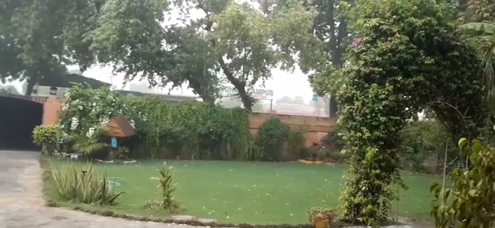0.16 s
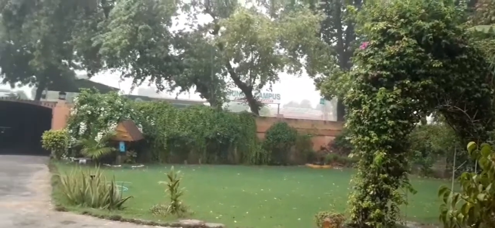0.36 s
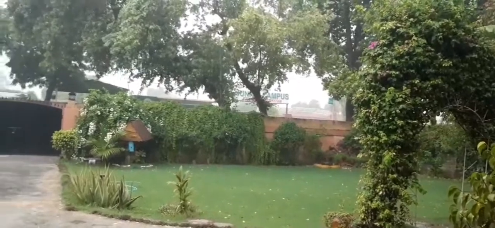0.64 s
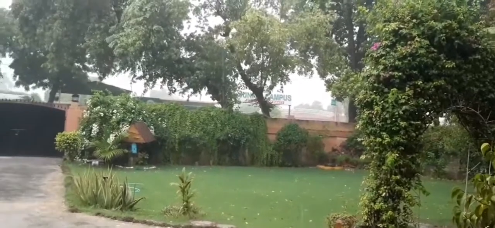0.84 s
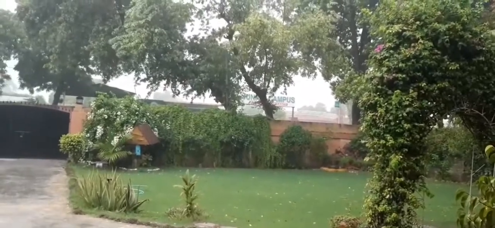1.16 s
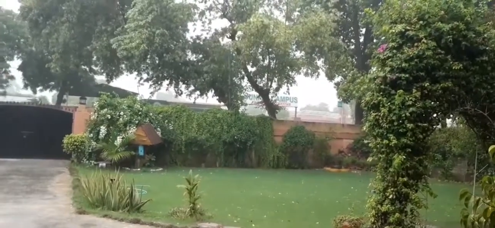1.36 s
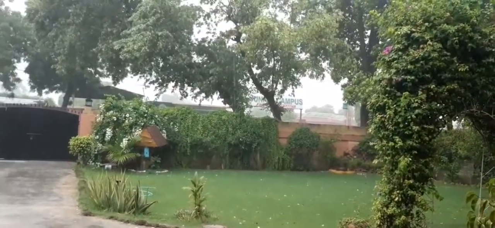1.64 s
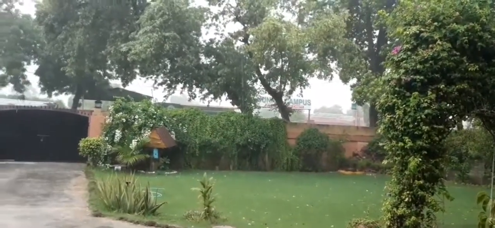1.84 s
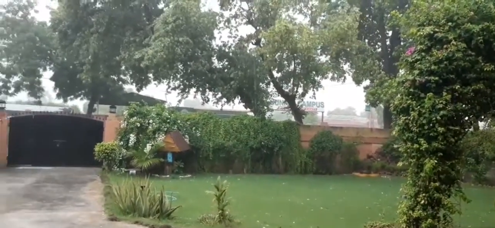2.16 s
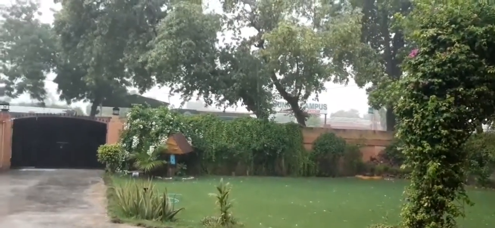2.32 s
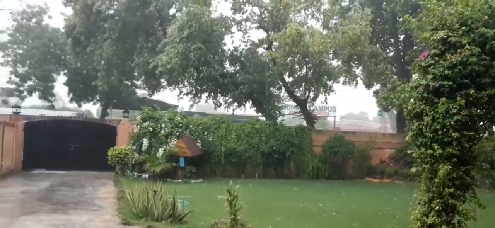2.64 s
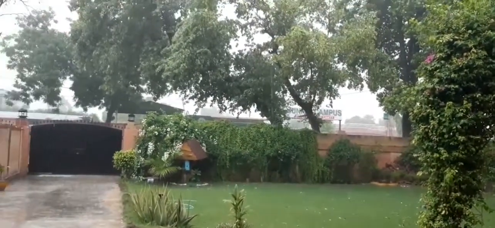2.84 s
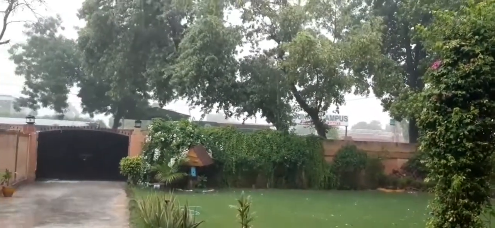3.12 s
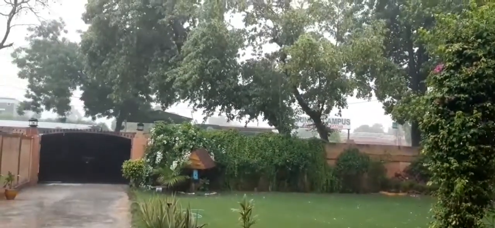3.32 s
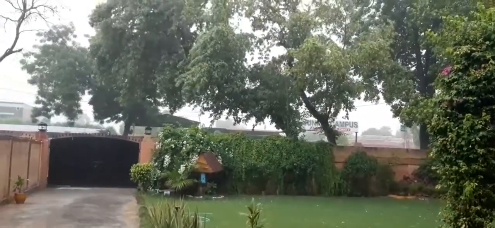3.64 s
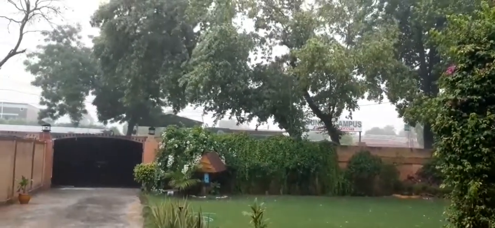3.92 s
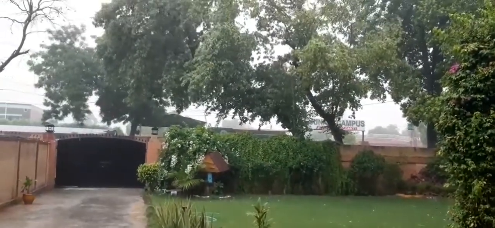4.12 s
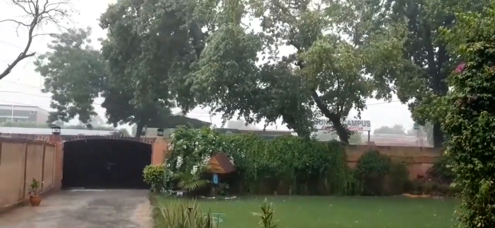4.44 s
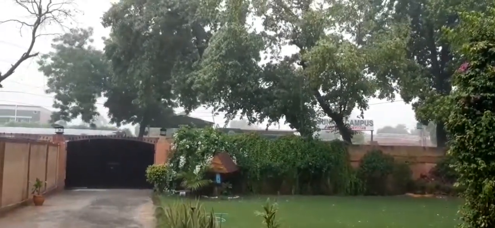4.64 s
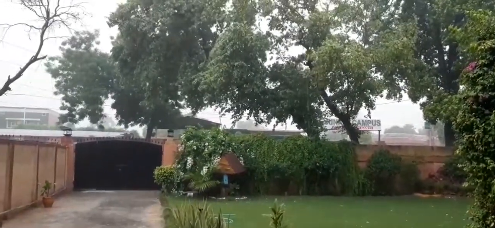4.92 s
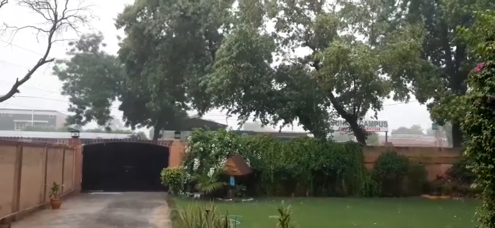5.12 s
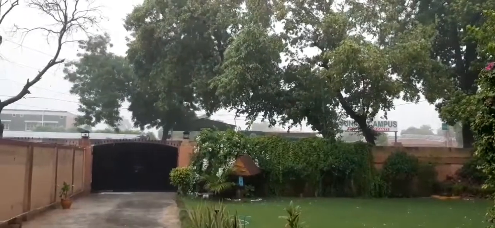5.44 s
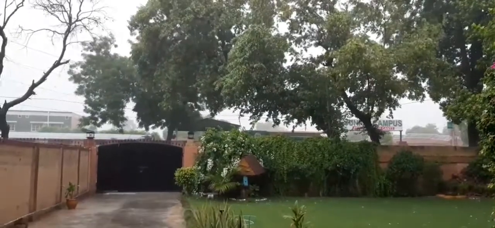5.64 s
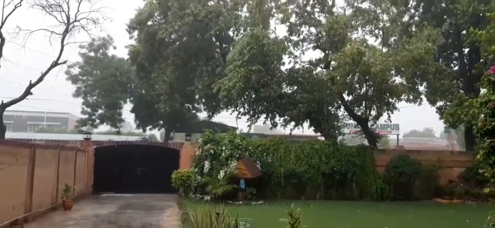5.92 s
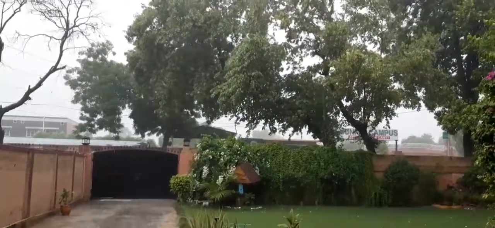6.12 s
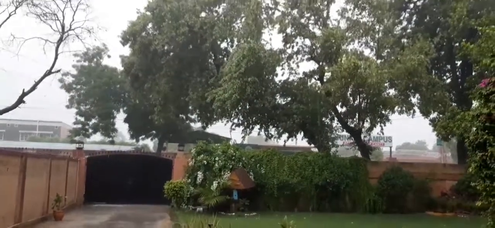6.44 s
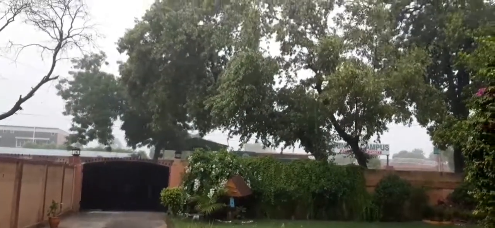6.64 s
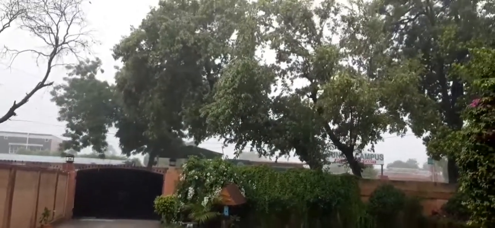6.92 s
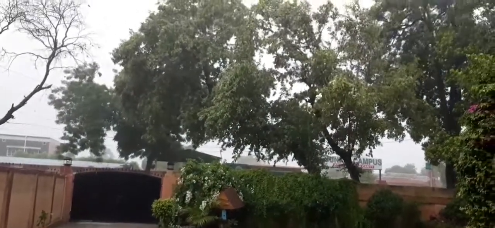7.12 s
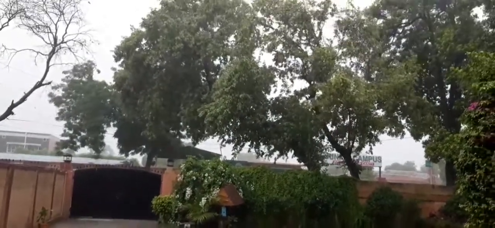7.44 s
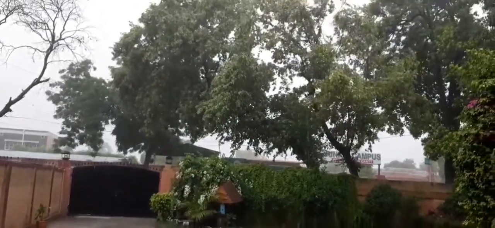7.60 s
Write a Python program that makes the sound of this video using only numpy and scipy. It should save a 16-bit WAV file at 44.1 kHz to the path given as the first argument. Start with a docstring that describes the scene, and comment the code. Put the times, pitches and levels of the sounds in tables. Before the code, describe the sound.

A heavy, steady downpour fills a garden for nearly eight seconds, heard from under a veranda. Dense hiss and fine spray on leaves and grass sit over a low distant roar that swells slightly after 3 s. Close eave drips smack wet paving with hard, bright clicks, short splashes and grainy spatter, sparse at first, a strong one at 1.8 s. High recorder hiss fades soon after 2 s. A tight cluster of drips hits around 3.0-3.2 s with burbling puddle bubbles; more bubbles come near 4.7-5 s. Strong smacks fall at 3.8, 4.2 and 5.3 s, the loudest at 5.9 s, then a rapid run at 6.65-6.8 s and more drips to the end. Very faint hoots at 3 and 4.8-5.7 s, dull knocks at 4 and 7.5 s, and soft air puffs and uneven rumble lie underneath. The right channel carries nearly everything.

```python
"""Heavy rain on a garden, heard from under a veranda roof: fat drips from the eaves smack, splash and spatter
on wet paving, as short pressure pulses followed by bursts of grainy noise. Smaller drops patter on leaves, and
countless far ones merge into coloured noise: a hiss and fine spray over a low roar. Bubbles ring in puddles;
modulated tones and low modes make faint far hoots and knocks. Low rumble, soft puffs of air and, at first,
a high hiss of the recorder lie beneath. Almost everything is in the right channel: the left is nearly silent."""
import sys
import numpy as np
from scipy import signal
from scipy.fft import rfft, irfft, next_fast_len
from scipy.io import wavfile
from scipy.ndimage import uniform_filter1d

SR = 44100
rng = np.random.default_rng(int(sys.argv[2]) if len(sys.argv) > 2 else 0)


def pcm_store(signal):
    """Save signal as 16-bit PCM."""
    levels = np.round(np.clip(np.atleast_2d(signal), -1, 1) * 32767)
    wavfile.write(sys.argv[1], SR, levels.astype(np.int16).T)


N = 342657
T = np.arange(N) / SR
SMACK_PEAK_S = 0.001  # a smack peaks this long after its start

# colour of the rain on leaves and grass: hz, density_db (dB per Hz)
HISS_COLOUR = [(200, -13.5), (600, -2.5), (1100, -3), (1800, 1), (2150, 2), (2500, 3.5), (3000, -1),
               (4500, -2), (6500, 1.7), (8000, -1), (12000, -14)]
# colour of the finest spray: hz, density_db (dB per Hz)
SPRAY_COLOUR = [(3000, -30), (6000, -17), (10000, 7), (13000, 4), (15500, 2.5)]
# response of the microphone port, a deep notch between two humps: hz, gain_db
PORT_RESPONSE = [(5200, 0.5), (5900, 2), (6450, 1), (6800, -6), (7300, -15), (7800, -59), (8500, -33),
                 (9300, -18.5), (10300, -12.5), (11500, -3.5), (12700, 3), (15500, 4)]


def undb(db):
    """Decibels to amplitude: twenty decibels are a factor of ten."""
    return 10 ** (np.asarray(db) / 20)


def unit(x):
    """Normalisation: scale to an rms of one."""
    return x / np.sqrt(np.mean(x ** 2))


def noise(size=N):
    """White noise: equal expected power at every frequency."""
    return rng.standard_normal(size)


def colour(x, points):
    """Minimum-phase filtering: the folded cepstrum of the (hz, db) points gives a causal response."""
    hz, db = np.transpose(points)
    size = 2 * next_fast_len(len(x))
    f = np.maximum(np.arange(size // 2 + 1) * SR / size, 1)
    log_gain = np.log(undb(np.interp(np.log(f), np.log(hz), db)))
    cepstrum = irfft(log_gain)
    # fold the negative times onto the positive ones
    cepstrum[1:size // 2] *= 2
    cepstrum[size // 2 + 1:] = 0
    response = np.exp(rfft(cepstrum))
    return irfft(rfft(x, size) * response)[:len(x)]


def walk(rate):
    """Slow random modulation: noise held for 1 / rate seconds, smoothed twice, with an rms of one."""
    k = int(SR / rate)
    steps = np.repeat(noise(N // k + 1), k)
    smooth = uniform_filter1d(uniform_filter1d(steps, k), k)
    return unit(smooth[:N])


def add(track, s, sound):
    """Superposition: mix a sound into a track at a time in seconds."""
    i = int(np.clip(s * SR, 0, N - 1))
    track[i:i + len(sound)] += sound[:N - i]


def level(points):
    """Amplitude envelope: gain over time from (time_s, level_db) points."""
    return undb(np.interp(T, *np.transpose(points)))


def swell(s, width_s):
    """A Gaussian envelope: a smooth rise and fall around a moment, with a top of one."""
    return np.exp(-((T - s) / width_s) ** 2)


def impacts(per_s, spread_db):
    """A random impulse process: independent arrivals, many small or far drops and a few big or near ones."""
    chance = rng.random(N)
    size = np.minimum(rng.exponential(size=N), 5)
    sign = np.sign(noise())
    return (chance < per_s / SR) * sign * undb(spread_db * size)


def wash(points, per_s, spread_db, flutter_db):
    """Dense superposition: drops merge into coloured noise whose strength flutters a little."""
    drops = unit(impacts(per_s, spread_db)) + noise()
    return unit(colour(drops, points)) * undb(flutter_db * walk(16))


def smack(hz, cycles=0.47, ring_db=-12, ring_cycles=1.5):
    """Impact pressure of a drop flattening on a wet surface, then a ring, longer on a springier surface."""
    t = np.arange(8 * SR // 1000) / SR - SMACK_PEAK_S
    pulse = np.exp(-(hz * t / cycles) ** 2 / 2)
    decay = np.exp(-abs(t) * hz / (ring_cycles * cycles))
    ring = undb(ring_db) * (t > 0) * (1 - pulse) * decay
    return -np.cos(2 * np.pi * hz * t) * (pulse + ring)


def droplets(hz, points, rise_s, fall_s, grain_db, broad_db=-1):
    """Granular noise of thrown droplets, coloured by smack and surroundings; it rises, then decays."""
    t = np.arange(SR // 3) / SR
    grains = np.clip(noise(len(t)), -2, 2)
    sizes = undb(grain_db * np.repeat(grains, 24)[:len(t)])  # each grain lasts 24 samples
    tuned = signal.fftconvolve(noise(len(t)) * sizes, smack(hz, cycles=0.25))[:len(t)]
    broad = unit(noise(len(t)) * sizes)
    ticks = unit(tuned) + undb(broad_db) * broad
    return unit(colour(ticks, points)) * (1 - np.exp(-t / rise_s)) * np.exp(-t / fall_s)


def splash(hz):
    """Breakup on impact: a fast burst of droplets with the colour of early reflections under the roof."""
    # colour of the echo under the roof: hz, gain_db
    veranda = [(500, -14), (1300, -11), (1800, 5), (2500, 12.5), (3100, 11), (4500, 9), (6500, 13),
               (12000, 7.5)]
    return droplets(hz, veranda, rise_s=0.0006, fall_s=0.012, grain_db=2.0)


def bubble(hz, cycles=7, glide=0.16):
    """Resonance of a trapped air bubble: a decaying ring that rises in pitch as it nears the surface."""
    t = np.arange(SR // 50) / SR
    age = t * hz / cycles
    pitch_hz = hz * (1 + glide * (1 - np.exp(-age)))
    return np.sin(2 * np.pi * np.cumsum(pitch_hz) / SR) * np.exp(-age)


def left_background(buffet_db=-12):
    """Superposed noises: a very faint hiss, an uneven rumble and weak puffs of air."""
    # colour of the low rumble: hz, density_db (dB per Hz)
    rumble_colour = [(25, -18), (60, -4), (105, -2), (150, -23), (220, -26), (300, -24), (420, -34),
                     (800, -26), (1100, -36.5), (3000, -37), (9000, -76)]
    far_hiss = undb(-78.5) * unit(colour(noise(), HISS_COLOUR))
    far_spray = undb(-67.0) * unit(colour(noise(), SPRAY_COLOUR))
    faint_hiss = colour(far_hiss + far_spray, PORT_RESPONSE)
    rumble = undb(-61.5 + 2.2 * walk(3.3)) * unit(colour(noise(), rumble_colour))
    return faint_hiss + rumble + undb(buffet_db) * buffet()


def recorder_hiss(start_db=-31, sag_db_per_s=2, hold_s=1.9, fade_db_per_s=28):
    """Exponential decay of noise: high hiss of the recorder sags slowly, then fades fast after hold_s."""
    db = start_db - sag_db_per_s * T - fade_db_per_s * np.maximum(T - hold_s, 0)  # the fade joins the sag
    hiss_colour = [(4500, -14), (5900, 10.5), (6700, 11.5), (7400, 0.0), (8400, -6.0), (11000, 0.5),
                   (14000, -16)]  # hz, gain_db
    return undb(db) * unit(colour(noise(), hiss_colour))


def drone(uneven_db=2.0):
    """Amplitude-modulated low noise: a far rumble, perhaps traffic, that comes up unevenly and recedes."""
    # colour of the rumble: hz, density_db (dB per Hz)
    rumble_colour = [(50, -32), (85, -7), (114, 0), (160, -3.5), (200, -12.5), (400, -40.5)]
    # level before the random unevenness: time_s, level_db
    rumble_level = [(0, -44), (2.5, -46.5), (3.05, -36), (3.35, -42), (4.05, -39), (4.4, -41), (4.9, -36.5),
                    (5.4, -41.5), (6.35, -44), (6.62, -34), (6.85, -52), (7.77, -52)]
    return level(rumble_level) * undb(uneven_db * walk(7.6)) * unit(colour(noise(), rumble_colour))


def knocks(rise_s=0.006, fall_s=0.03, blur=0.012):
    """Modal vibration: a few low modes make far hollow knocks, softened and blurred by the distance."""
    # the knocks: start_s, level_db, pitch_ratio
    strikes = [(4.025, -33, 1.04), (7.527, -28, 1.0)]
    # modes at a pitch ratio of one: pitch_hz, level_db
    modes = [(684, 0), (818, 0), (931, -7), (1170, -3)]
    out, t = np.zeros(N), T[:SR // 4]
    envelope = (1 - np.exp(-t / rise_s)) * np.exp(-t / fall_s)
    for s, db, ratio in strikes:
        ring = np.zeros(len(t))
        for hz, mode_db in modes:
            pitch_hz = ratio * hz * (1 + blur * walk(120)[:len(t)])
            ring += undb(mode_db) * np.sin(2 * np.pi * np.cumsum(pitch_hz) / SR)
        add(out, s, undb(db) * ring * envelope)
    return out


def hoots(waver=0.006):
    """Frequency modulation: faint sine tones wander randomly in pitch, blurred by the distance."""
    # the hoots: start_s, length_s, pitch_hz, level_db
    calls = [(3.05, 0.5, 460, -45.5), (4.815, 0.16, 563, -38), (5.009, 0.21, 576, -36.5),
             (5.407, 0.29, 428, -42.5)]
    out = np.zeros(N)
    for s, length_s, hz, db in calls:
        gate = signal.windows.tukey(int(length_s * SR), .5)
        pitch_hz = hz * (1 + waver * walk(28.8))
        tone = unit(np.sin(2 * np.pi * np.cumsum(pitch_hz) / SR))
        add(out, s, undb(db) * gate * tone[:len(gate)])
    return out


def buffet():
    """Turbulent pressure of air puffs on a microphone port: soft swells of very low noise."""
    # the puffs: centre_s, half_width_s, level_db
    puffs = [(1.05, 0.18, -44), (2.62, 0.084, -46), (3.0, 0.06, -33.5), (5.55, 0.11, -32), (6.3, 0.39, -47)]
    # colour of the puffs: hz, density_db (dB per Hz)
    puff_colour = [(20, -36), (38, -12), (55, -2), (80, 4), (160, -30), (600, -68)]
    strength = sum(undb(db) * swell(s, width_s) for s, width_s, db in puffs)
    return strength * unit(colour(noise(), puff_colour))


def roar():
    """Incoherent addition: the far downpour is low coloured noise that swells once and sinks back."""
    # colour of the far downpour: hz, density_db (dB per Hz)
    roar_colour = [(25, -44), (40, -17), (58, -5), (95, -2.5), (114, 0), (145, -2.5), (200, -2.5),
                   (285, -2.5), (410, -9.5), (540, -6), (660, -9.5), (820, -5), (1050, -13.5), (2000, -32)]
    # level of the far downpour: time_s, level_db
    roar_level = [(0, -32.5), (1.2, -33), (2.0, -33.5), (2.9, -31.5), (4.9, -30.5), (5.9, -32), (7.77, -32)]
    return level(roar_level) * unit(colour(noise(), roar_colour))


def hiss(start_db=-26, ease_db_per_s=0.0859):
    """Incoherent addition of drops on leaves and grass: a dense hiss that eases very slightly."""
    shower = wash(HISS_COLOUR, per_s=3000, spread_db=3.0, flutter_db=0.88)
    return undb(start_db - ease_db_per_s * T) * shower


def spray():
    """Incoherent addition of the finest drops: high coloured noise of changing level."""
    # level of the spray before its flutter: time_s, level_db
    spray_level = [(0, -27), (0.85, -25.5), (1.8, -28), (2.6, -29.5), (3.1, -30.5), (4.7, -30), (5.8, -32),
                   (6.6, -29.5), (7.77, -29)]
    return level(spray_level) * wash(SPRAY_COLOUR, per_s=2000, spread_db=1.5, flutter_db=1.3)


def patter(per_s=16, dry_db=-38.5, near_hz=4100, wet_db=-40.0):
    """Impulse excitation by smaller drops: the nearest placed singly, the rest random at four pitches."""
    # the clearest small drops on near leaves: peak_s, peak_db
    leaf_drops = [(0.379, -11), (0.481, -13), (0.678, -12), (0.875, -9), (1.008, -11), (1.056, -11),
                  (1.172, -9), (1.354, -10), (1.416, -12), (1.543, -12), (1.564, -12), (1.596, -9),
                  (1.711, -10), (1.882, -10), (2.079, -9), (2.18, -12), (2.317, -12), (2.474, -12),
                  (2.576, -11), (2.648, -10), (2.728, -12), (2.954, -12), (3.217, -11), (3.339, -12),
                  (3.543, -12), (3.685, -11), (3.705, -10), (4.103, -13), (4.114, -12), (4.246, -9),
                  (4.333, -13), (4.404, -10), (4.456, -12), (4.796, -10), (4.875, -11), (5.139, -13),
                  (5.386, -10), (5.498, -11), (5.581, -12), (6.016, -11), (6.154, -9), (6.221, -12),
                  (6.346, -12), (6.386, -8), (6.425, -11), (6.632, -11), (6.814, -10), (6.846, -10),
                  (6.865, -11), (7.03, -12), (7.062, -9), (7.229, -9), (7.282, -10), (7.32, -10),
                  (7.468, -12), (7.532, -9), (7.588, -9), (7.718, -12)]
    random_ticks = np.zeros(N)
    for hz in (2930, 3480, 4440, 5450):  # the smaller the drop, the higher
        drops = impacts(per_s, spread_db=1.5)
        random_ticks += signal.fftconvolve(drops, smack(hz, cycles=0.45))[:N]
    ticks = undb(dry_db) * unit(random_ticks)
    for s, db in leaf_drops:
        tick = smack(near_hz * rng.uniform(0.85, 1.15), cycles=0.55)
        add(ticks, s - SMACK_PEAK_S, undb(db) * tick)
    echo = signal.fftconvolve(ticks, splash(3300))[:N]
    return ticks + undb(wet_db) * unit(echo)


def puddles(count=40, spread_octaves=0.153, scatter_db=2.0):
    """Bubble resonance: drips in standing water churn up a swarm, thick at first and soon thinning out."""
    # drips into a puddle: start_s, bubble_db, centre_pitch_hz, settling_s (bubbles scatter in level and pitch)
    puddle_drips = [(3.021, -27, 1950, 0.1), (3.1, -28, 1990, 0.32), (4.694, -34, 2060, 0.034),
                    (4.91, -26.5, 2000, 0.089)]
    out = np.zeros(N)
    for s, db, hz, settle_s in puddle_drips:
        for k, (pitch, size) in enumerate(rng.standard_normal((count, 2))):
            age = ((k + rng.random()) / count) ** 2  # squaring crowds the bubbles towards the start
            gain = undb(db + scatter_db * size) * np.exp(-age)
            add(out, s + settle_s * age, gain * bubble(hz * 2 ** (spread_octaves * pitch)))
    return out


def eaves(wet_db=3.5, late_db=-2.0, echo_s=0.0084, echo_db=-13, ping_db=-10):
    """Impact, reflection and breakup: each fat drip smacks, pings a tiny bubble, echoes and scatters."""
    # the loudest drips: peak_s, smack_peak_db, smack_pitch_hz, smack_length_cycles,
    # splash_db (wet_db is added for the splash)
    drips = [(0.3221, -13, 3100.0, 0.45, -25.5), (0.5753, -10, 2900.0, 0.6, -22.8),
             (1.0986, -7.5, 3900.0, 0.4, -26.0), (1.2492, -8.0, 3600.0, 0.45, -27.5),
             (1.5336, -5.5, 3500.0, 0.8, -29), (1.7638, -1.5, 4200.0, 0.55, -22.0),
             (1.8578, -8.5, 4700.0, 0.6, -32.0), (1.9969, -6.0, 4900.0, 0.6, -30),
             (2.061, -6.5, 4200.0, 0.45, -24.5), (2.0912, -9.5, 2900.0, 0.8, -24.0),
             (2.4083, -12.5, 3100.0, 0.8, -32), (2.5248, -10.0, 4400.0, 0.8, -32.0),
             (2.5344, -9.0, 5300.0, 0.6, -27.0), (2.779, -9.5, 3300.0, 0.6, -30),
             (3.0131, -6, 3500.0, 0.45, -30.0), (3.0189, -2, 3700.0, 0.45, -22.5),
             (3.0466, -9.5, 3600.0, 1.1, -26.0), (3.0943, -3.5, 3500.0, 0.5, -24),
             (3.117, -6.5, 3600.0, 0.4, -27.0), (3.1217, -9, 5500.0, 0.8, -31.0),
             (3.137, -11, 4000, 0.4, -34), (3.178, -7.5, 3100.0, 0.45, -26.5), (3.284, -12, 4500, 0.6, -31),
             (3.362, -11, 4800, 0.6, -31), (3.46, -11, 3800, 0.45, -30), (3.5067, -5.0, 3800.0, 0.4, -27.0),
             (3.6283, -7.5, 3700.0, 1.0, -28), (3.696, -11, 2900, 0.45, -26),
             (3.8005, -1, 4300.0, 0.45, -25.0), (3.911, -15, 3800, 0.8, -29.5),
             (4.075, -13, 4300, 0.45, -30), (4.151, -14, 3300, 0.6, -29), (4.2349, -3, 3800.0, 0.55, -28),
             (4.413, -11.5, 3600.0, 0.6, -25), (4.516, -6.5, 3900.0, 0.45, -23.0),
             (4.5245, -8.0, 3500.0, 0.4, -32.0), (4.6507, -11, 5800.0, 1.5, -24),
             (4.6844, -9.5, 2900.0, 0.8, -23), (4.6944, -9, 2600.0, 1.1, -26),
             (4.8839, -11.5, 3700.0, 1.1, -26), (4.9095, -4.5, 3200, 0.5, -23),
             (4.9274, -5.5, 4700.0, 0.6, -28), (4.9662, -12.0, 3200.0, 0.8, -32.0),
             (4.9956, -8.0, 6000.0, 1.5, -29.0), (5.0422, -7, 4500.0, 0.6, -28),
             (5.193, -7.5, 3500.0, 0.6, -25.5), (5.2499, -7.0, 3600.0, 0.4, -26.0),
             (5.2585, -4.0, 3300.0, 0.6, -22.3), (5.2729, -9.5, 3000.0, 0.8, -32.0),
             (5.4151, -8.0, 3600.0, 0.6, -30.0), (5.5171, -9.5, 3900.0, 0.6, -32.0),
             (5.5466, -8.0, 3200.0, 1.1, -27.0), (5.6726, -5, 4400.0, 0.5, -26.0),
             (5.8888, 1, 3750, 0.58, -21.2), (5.8944, -12, 4200, 0.8, -32),
             (5.8988, -12.5, 3500.0, 1.1, -30), (5.9641, -6.0, 4300.0, 0.5, -23),
             (6.1351, -8.5, 4600.0, 0.6, -26.0), (6.31, -12, 4000, 0.45, -30),
             (6.3816, -11, 2500.0, 0.6, -25), (6.392, -11, 2900, 0.45, -27),
             (6.4636, -7.5, 3900.0, 0.4, -24.0), (6.6511, -4, 3100.0, 0.7, -21.8),
             (6.6614, -10.5, 3000.0, 0.8, -23.5), (6.692, -13, 2700, 0.6, -28),
             (6.714, -12, 2700, 0.6, -28.5), (6.735, -11, 3100, 0.5, -26.5),
             (6.7576, -7, 3200.0, 0.45, -26.5), (6.7793, -6, 3900.0, 0.45, -24.5),
             (6.809, -12, 3200, 0.5, -27), (7.0031, -6, 3400.0, 0.6, -26.0),
             (7.069, -8.0, 3500.0, 0.6, -25.5), (7.1704, -8.5, 3400.0, 0.6, -24.5),
             (7.2228, -8.0, 3400.0, 0.4, -32.0), (7.2388, -7, 3600.0, 0.6, -26.0),
             (7.4787, -3.5, 3400.0, 0.5, -21.8), (7.6426, -7, 3500.0, 0.65, -21.3),
             (7.7578, -5.5, 3000.0, 0.8, -21.5)]
    # colour of the fine spatter that falls back later: hz, gain_db
    spatter_colour = [(500, -17), (1600, -7), (2450, 14), (3100, 5.5), (4500, 5.5), (6500, 10), (9000, -12),
                      (13000, 0)]
    usual_splash_db, spatter_growth = -24, 1.86  # growth: dB of spatter per dB of splash
    out = np.zeros(N)
    for s, db, hz, cycles, splash_db in drips:
        start = s - SMACK_PEAK_S
        hit = undb(db) * smack(hz, cycles)
        add(out, start, hit)
        ping_s = 0.0056 * rng.uniform(0.92, 1.0)
        ping = smack(5900 * rng.uniform(0.98, 0.99), cycles=1.3)
        add(out, start + ping_s, undb(db + ping_db) * ping)
        add(out, start + echo_s, undb(echo_db) * hit)  # from the nearest wall
        add(out, s, undb(splash_db + wet_db) * splash(hz))
        # bigger splashes throw more spatter
        spatter_db = usual_splash_db + spatter_growth * (splash_db - usual_splash_db)
        spatter = droplets(hz, spatter_colour, rise_s=0.023, fall_s=0.087, grain_db=5.0)
        add(out, start, undb(spatter_db + late_db) * spatter)
    return out


def scene():
    """Linear superposition: rain, puffs and far sounds pass the port on the right; the left is nearly silent."""
    far = drone() + knocks() + hoots() + buffet()
    rain = roar() + hiss() + spray() + patter()
    near = puddles() + eaves()
    right = colour(far + rain + near, PORT_RESPONSE) + recorder_hiss()
    return np.array([left_background(), right])


def record(dry):
    """Saturation and band limiting: the recorder rounds the highest peaks and cuts the top steeply."""
    top_hz, ceiling = 15440, .95
    rounded = dry / (1 + (dry / ceiling) ** 8) ** (1 / 8)
    low_pass = signal.ellip(14, .1, 80, top_hz, fs=SR, output="sos")
    return signal.sosfilt(low_pass, rounded)


dry = scene()
out = record(dry)
pcm_store(out)
```